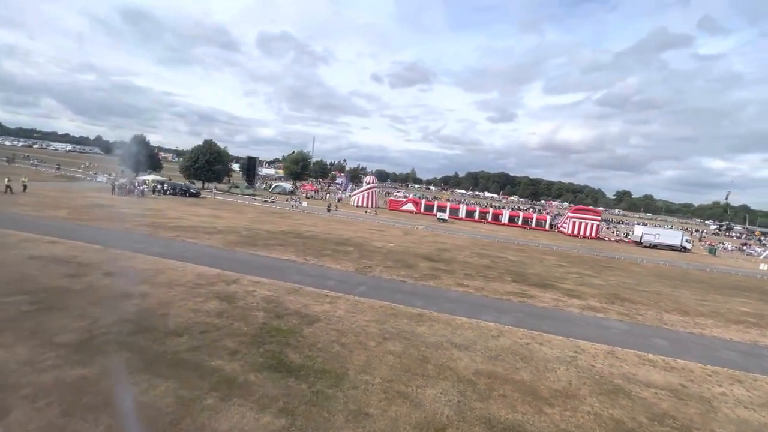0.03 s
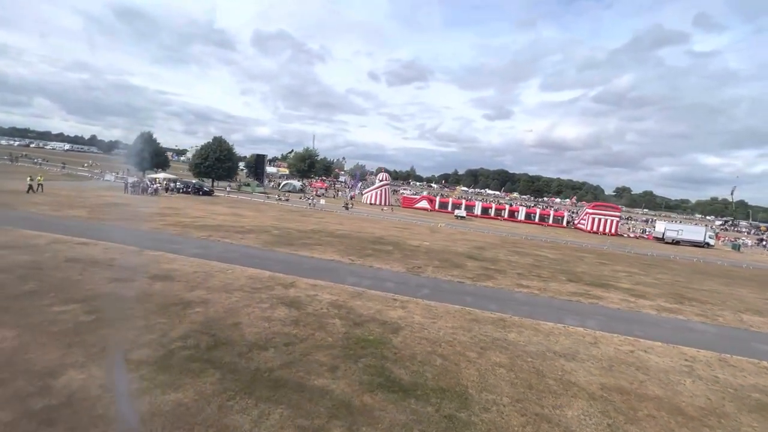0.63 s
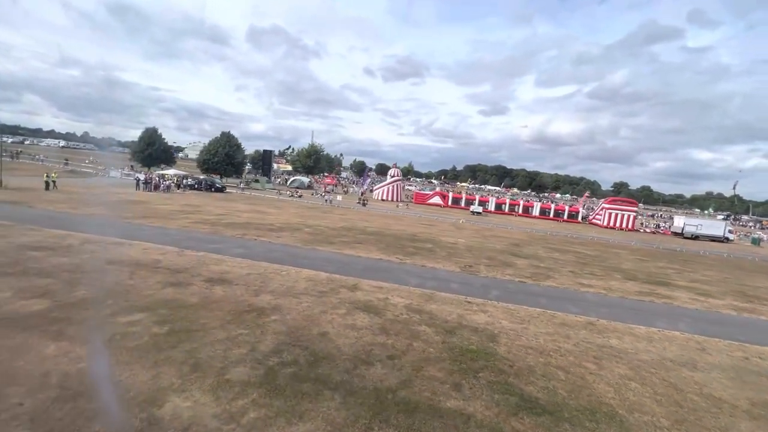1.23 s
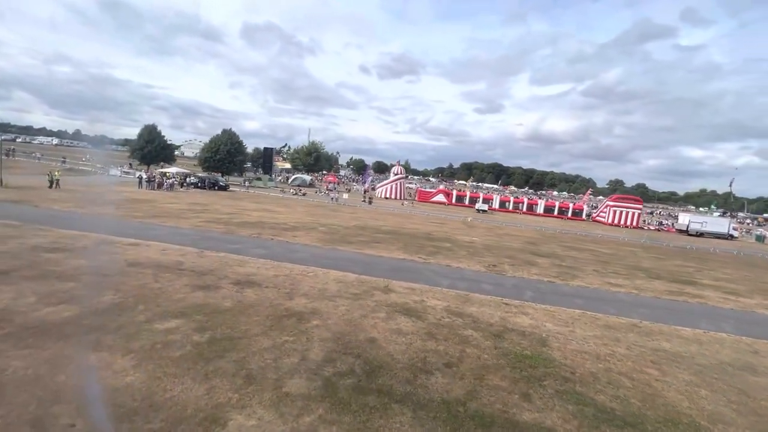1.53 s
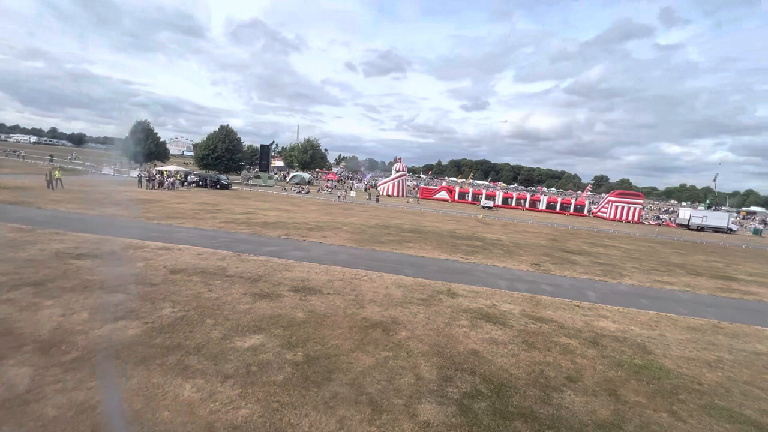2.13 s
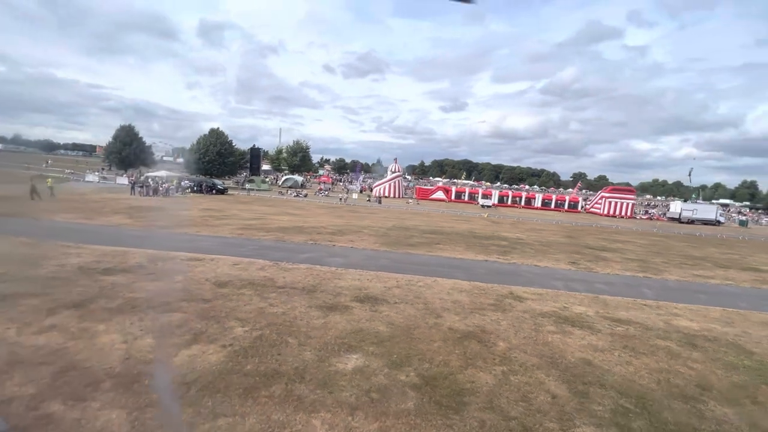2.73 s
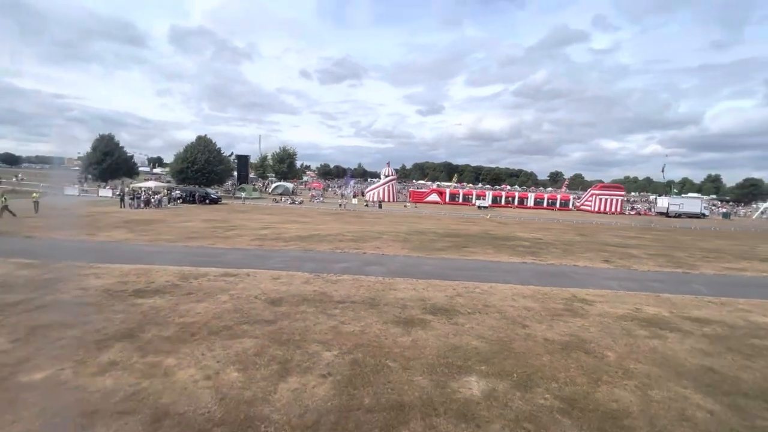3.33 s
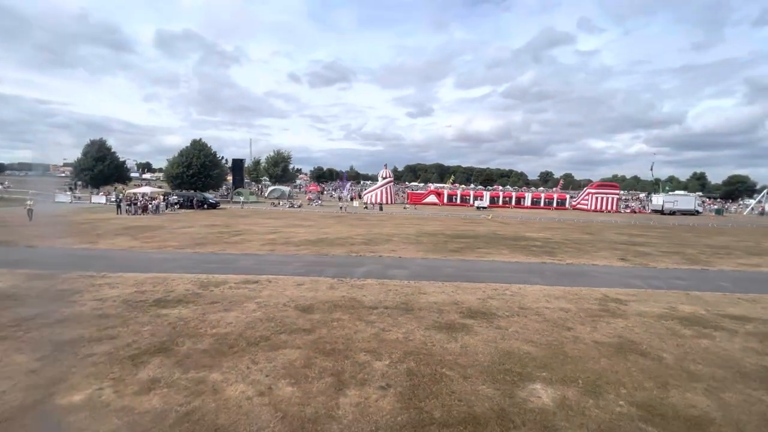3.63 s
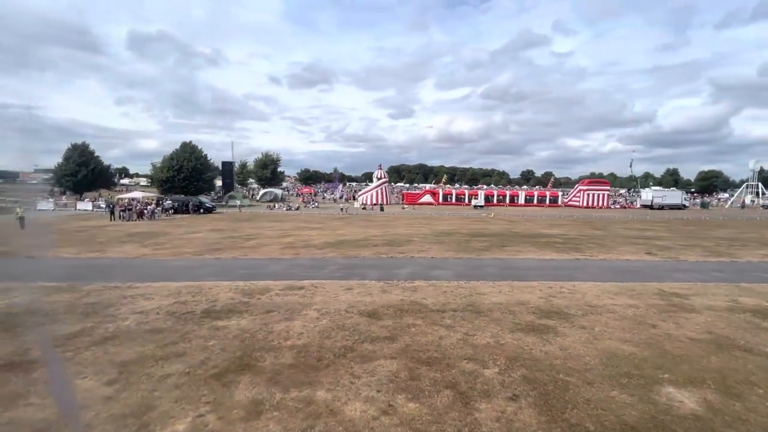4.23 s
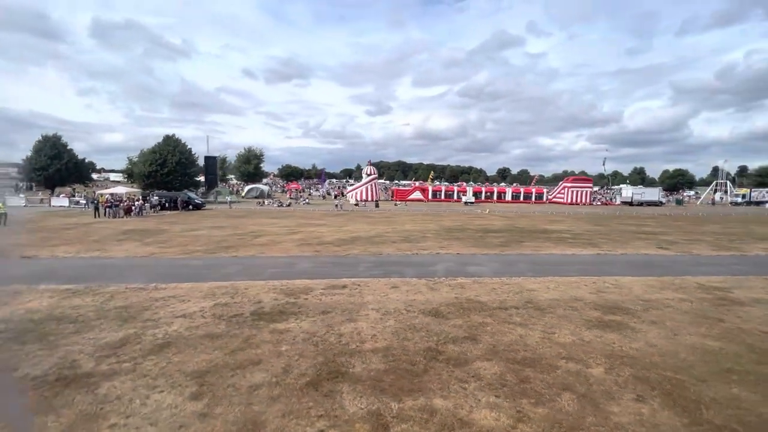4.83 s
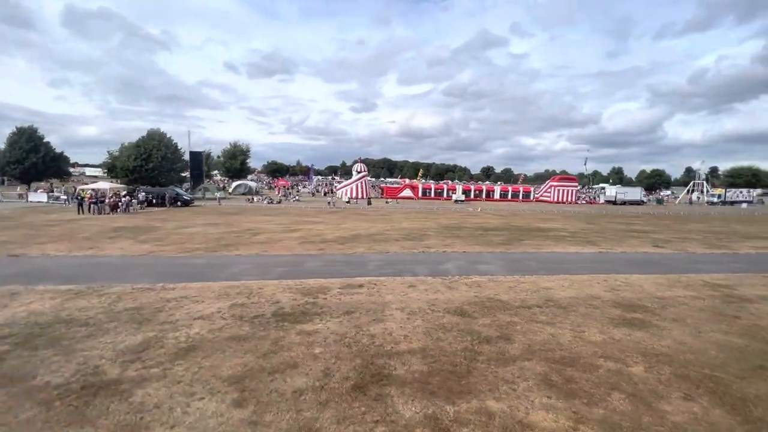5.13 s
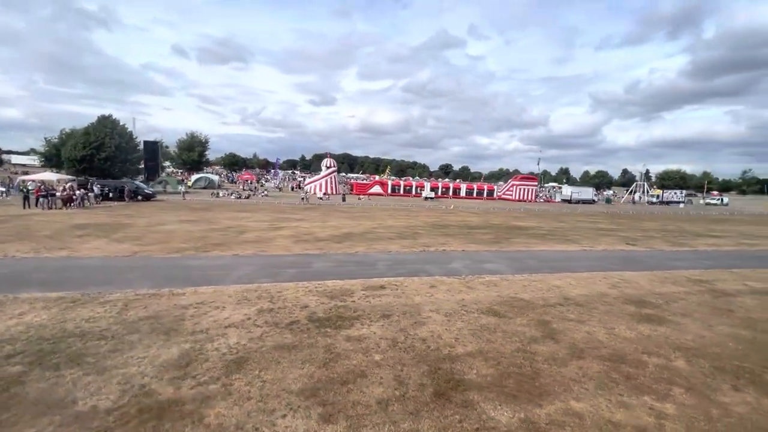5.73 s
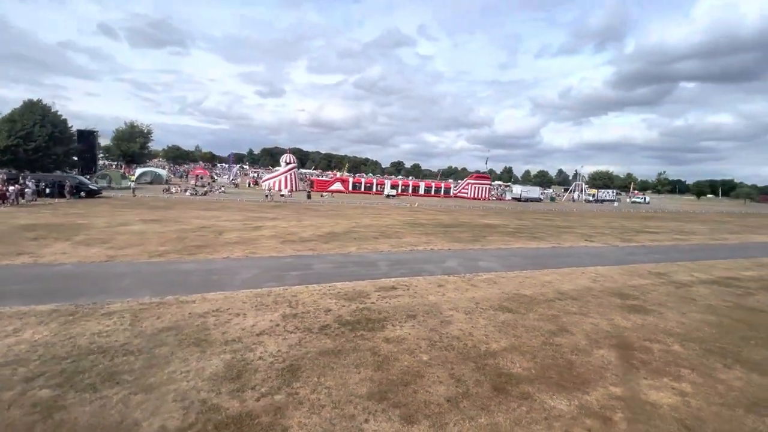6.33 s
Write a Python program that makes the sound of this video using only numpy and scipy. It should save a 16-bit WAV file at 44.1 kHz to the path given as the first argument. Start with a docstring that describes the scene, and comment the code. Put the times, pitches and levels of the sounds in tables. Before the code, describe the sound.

Inside a low-flying helicopter, a deep rotor thump and steady air roar run under high gear and engine whines.

```python
"""A deep thumping and a roar of air fill the cabin of a turbine helicopter sinking low over a field.
The two-bladed main rotor thumps through the hull, and the air it pushes down (the downwash) roars.
The tail rotor drones, and shafts and gears whine, their pitch tied to the rotor speed.
Far above them whistles the compressor, on the engine's own free-turning shaft (the spool).
Near the end comes one dull knock."""
import sys
import numpy as np
from scipy import signal
from scipy.fft import rfft, irfft, next_fast_len
from scipy.io import wavfile

SR = 44100
rng = np.random.default_rng(int(sys.argv[2]) if len(sys.argv) > 2 else 0)


def to_wav(sig):
    """Store sig (one row per channel, or 1-D mono) as 16-bit WAV at the path in sys.argv[1].

    Samples outside -1..1 are clipped; the rate is SR.
    """
    pcm = np.clip(np.atleast_2d(sig), -1, 1) * 32767
    pcm = np.round(pcm).astype(np.int16)
    wavfile.write(sys.argv[1], SR, pcm.T)  # frames by channels


N = 280905
# At normal speed: main rotor turns, tail blade passes and main gear teeth meeting (the mesh), per second.
ROTOR_HZ, TAIL_HZ, MESH_HZ = 6.492, 84.25, 1883.5

# The tone colour of the air roar. Each row: frequency in Hz, left and right level in dB per Hz.
ROAR_SPECTRUM = [(29, -66, -68), (45.3, -43, -42), (71, -46, -44), (133, -48.5, -43.5), (213, -48, -45.5),
                 (250, -50.5, -46), (298, -53.5, -48.5), (540, -61, -53), (657, -59.5, -59),
                 (805, -61, -57), (905, -63.5, -60.5), (1100, -67.5, -65), (1220, -66, -63.5),
                 (1290, -63.5, -65.5), (1510, -71, -65.5), (1700, -72, -68), (1976, -69, -64.5),
                 (2140, -79.5, -79), (2400, -81, -75), (2660, -84.5, -73), (2940, -91, -79),
                 (3100, -82.5, -77.5), (3800, -92, -82.5), (4820, -91, -77.5), (5080, -98, -78),
                 (5300, -91, -86.5), (5470, -94, -79.5), (6090, -98, -79), (6920, -100, -87),
                 (7700, -101, -100), (8280, -100, -95), (10460, -105, -105), (11410, -91, -90.5),
                 (13500, -79, -82), (13900, -102, -102)]
# How alike the roar is at both ears. Each row: frequency in Hz, likeness (1 the same, -1 opposite).
EAR_LIKENESS = [(60, 1), (130, 0.87), (290, 0.72), (480, 0.35), (590, 0), (690, -0.85), (840, -0.8),
                (1050, -0.3), (1400, -0.45), (2200, -0.3), (2800, 0.1), (7000, -0.35), (8300, .6),
                (11000, -0.12)]
# The downwash grows as the ground nears. Each row: time in seconds, gain in dB.
WASH_LEVEL = [(0, -0.2), (1, -1.5), (2.2, -2.5), (2.7, -1), (3.3, 0.3), (4.2, 1), (4.8, 1), (5.3, 1.5),
              (5.9, 1.5), (6.37, 1.3)]
# The roar surges around 450 Hz. Each row: time in seconds, gain in dB.
SURGE_LEVEL = [(0, 0.5), (1.9, 1.2), (2.2, -1), (2.75, 2.7), (3, -2.4), (3.5, -0.8), (4.2, -0.5), (4.9, 1),
               (5.55, 2.4), (5.9, 0), (6.37, 2.5)]

# How fast the engine spins. Each row: time in seconds, spool turns per second.
SPOOL_SPEED = [(0.0, 749.0), (0.55, 750.0), (1.8, 773.0), (2.3, 772.0), (3.1, 764.8), (3.8, 769.8),
               (4.4, 771.2), (5.3, 782.8), (6.37, 773.0)]
# The compressor whistle comes and goes. Each row: time in seconds, relative level in dB.
WHISTLE_LEVEL = [(0.15, -47), (0.6, -50), (1.5, -50), (1.9, -53.5), (2.4, -45.5), (2.65, -51.5),
                 (3.0, -40.5), (3.45, -42.5), (3.9, -48.5), (4.45, -45), (4.85, -55), (6.2, -51)]
# The spool and its gears. Each row: multiple of the spool speed, left and right relative level in dB,
# lead in radians (how far the wave at the left ear is ahead of the right).
SPOOL_TONES = [(1, -46, -40.5, -2.8), (3, -61.5, -53.5, -1.6), (4, -78, -65, 0), (5.856, -68, -55.5, 0),
               (6.1, -70, -55, 0), (6.344, -67, -53.5, 0), (6.588, -72, -57.5, 0), (6.832, -76, -62, 0),
               (8, -85, -68, 0)]
# The lowest spool tone swells and fades. Each row: time in seconds, relative level in dB.
SPOOL_TONE_LEVEL = [(0, -39.5), (1.1, -31), (1.7, -55), (2.8, -76), (3.3, -38), (4.2, -37.5), (4.9, -32),
                    (6.37, -36)]
# The engine's four clearest whines, as multiples of the spool speed.
ENGINE_WHINES = (3, 5.856, 6.1, 6.344)
# Those whines swell and fade. Each row: time in seconds, then a gain in dB for each of the four.
ENGINE_WHINE_LEVEL = [(0.2, -4, -5, 5, 3), (1, 2, -5, 2, 3.5), (1.45, 7, 2, 4.5, 4), (1.9, 5, 1, 3, -5),
                      (2.25, 9.5, 2, 1, -8), (2.6, 4, 2, 4, 2), (3.3, 11, -3, 5, -1), (3.9, 5, 1, 5.5, 5.5),
                      (4.6, 11, -2, -3, 6.5), (4.95, 9, 6, -7, -6), (5.7, 8, 2, -9, 2),
                      (6.3, 3, 7.5, -2, -7)]

# Rotors and gears drift around their normal speed. Each row: time in seconds, main mesh pitch in Hz.
DRIVE_SPEED = [(0.0, 1874), (0.03, 1882), (1.19, 1868), (2.29, 1898), (3.25, 1875), (3.78, 1890),
               (4.49, 1868), (5.53, 1894), (6.33, 1893), (6.37, 1897)]
# Shaft hums and gear whines. Each row: pitch in Hz, left and right level in dB, lead in radians.
GEAR_TONES = [(98.9, -29, -22, -0.3), (164.9, -36, -34, -0.1), (403.7, -46, -42, -0.9),
              (488.5, -60, -44, -3.0), (624.5, -53, -46, -3.1), (637.9, -44, -40, -1.7),
              (650.7, -43, -36.5, 3.1), (976.4, -43, -40, -2.0), (1232.8, -54, -59, -2.3),
              (1275.8, -48, -51, -2.8), (1288.6, -40.3, -37.3, -1.9), (1314.9, -55, -51, -2.9),
              (1464.9, -59, -53, -2.7), (1784.6, -49, -50, 0.3), (1883.5, -29.7, -36.2, 1.6),
              (1914.0, -51, -55, 1.3), (1927.2, -50, -55, 1.3), (1940.0, -49, -47, 1.2),
              (1953.0, -51, -53, 1.3), (1983.1, -54, -60, -3.0), (2531.8, -72, -61, 1.6),
              (2577.2, -67, -56.5, 1.5), (3767.0, -76, -70, 0)]
# Gear whines pulse as the rotor turns. Each row: pitch in Hz, depth of the once-a-turn pulse, its peak
# in turns, depth of the twice-a-turn pulse, its peak in turns, roughness, roughness width in Hz.
GEAR_PULSES = [(976, .1, .55, .2, .05, .38, 35), (1289, .11, .1, .22, .25, .36, 50),
               (1883.5, .07, .33, .04, .45, .15, 70), (2577, .4, .7, .35, .2, 1.2, 28)]
# Six tones swell about their average level. Each row: time in seconds, relative level in dB.
MESH_LEVEL = [(0.0, -39.5), (0.62, -40.5), (0.8, -37.5), (1.21, -42), (1.35, -38), (3.73, -38),
              (3.81, -35.5), (4.31, -41.5), (5.06, -40.5), (5.09, -37), (6.23, -36), (6.37, -36.5)]
SHAFT_HUM_LEVEL = [(0, -23), (1, -25.5), (1.6, -24), (2.1, -22), (3.2, -22), (4.4, -22), (5.3, -21.5),
                   (6.37, -22.5)]
TAIL_DRONE_LEVEL = [(0, -34), (1, -37), (1.5, -31), (2.1, -31.5), (2.9, -30.5), (3.5, -34.5), (4.6, -37.5),
                    (5.4, -36), (5.9, -33), (6.2, -27), (6.37, -35)]
LOW_WHINE_LEVEL = [(0.4, -43), (0.9, -45), (1.1, -42.5), (1.8, -47.5), (2.0, -42.5), (2.85, -46),
                   (3.7, -40), (4.2, -43), (4.6, -40), (4.85, -45), (5.25, -41), (6.3, -44)]
MIDDLE_WHINE_LEVEL = [(0.2, -40.5), (1.3, -44), (2.3, -39), (2.75, -41), (2.97, -45), (3.45, -40.5),
                      (4.05, -40.5), (4.5, -47.5), (4.95, -43), (5.45, -47.5), (5.9, -41), (6.3, -39.5)]
HIGH_WHINE_LEVEL = [(0.0, -69), (1.31, -65), (1.35, -52), (2.4, -55.5), (4.81, -52.5), (6.23, -58),
                    (6.37, -53)]
# Which tone follows which swell. Each row: pitch in Hz, level table.
SWELLS = [(99, SHAFT_HUM_LEVEL), (253, TAIL_DRONE_LEVEL), (976, LOW_WHINE_LEVEL),
          (1289, MIDDLE_WHINE_LEVEL), (2577, HIGH_WHINE_LEVEL)]
# A tone beside a cabin resonance (a standing wave) changes level with the speed.
# Each row: pitch in Hz, dB per percent of extra speed, random swell in dB.
NEAR_RESONANCE = [(337, -2.5, 1.5)]

# The tail rotor. Each row: multiple of its blade rate, left and right level in dB, lead in radians.
TAIL_TONES = [(1, -35, -31, -0.6), (2, -44, -41, -0.9), (3, -34.5, -34.5, 0.4), (4, -40, -30, 3.0),
              (5, -45, -39.5, 0.1), (6, -54, -38, 0.3)]
# How hard the main blades slap the air. Each row: time in seconds, slap from 0 to 1.
BLADE_SLAP = [(0.8, 1), (1.3, 0.45), (1.8, 0), (3.2, 0), (3.9, 0.35), (4.6, 0.35), (5.2, 0.7), (5.9, 0.05)]
# The load on the main blades. Each row: time in seconds, relative load in dB.
BLADE_LOAD = [(0.25, -20), (1.35, -20.5), (1.65, -24), (2.25, -23), (2.8, -26), (3.15, -18.5), (3.5, -20.5),
              (3.75, -19.5), (4.3, -21.5), (4.55, -26), (4.8, -25), (5.05, -20.5), (5.55, -21.5),
              (5.8, -24), (6.0, -18.5), (6.25, -30.5)]
# The tones in the thump. Each row: multiple of the rotor speed, relative level in dB,
# dB added per dB of load, dB added per unit of slap, random swell in dB.
ROTOR_TONES = [(4, -50, -5, 0, 1.5), (8, -24.5, 2.07, -0.5, -0.5), (12, -39, -1.5, 4, 4.5),
               (14, -56, -3.5, 10, 7), (16, -39, 3.5, 3, 1), (18, -45, 4.5, 17, 4.5)]
# Rotor throbs near 39, 65 and 71 Hz. Each row: time in seconds, relative level in dB.
DEEP_THROB_LEVEL = [(0, -26), (0.8, -25), (1.25, -44), (1.8, -36), (2.1, -44), (2.65, -32), (3.25, -45),
                    (3.75, -25), (4.3, -46), (4.6, -25), (5.1, -27), (5.7, -44), (6.37, -33)]
MIDDLE_THROB_LEVEL = [(0, -36), (0.5, -25), (1, -30), (1.4, -28), (2, -31), (3, -19.5), (3.45, -36),
                      (3.8, -30), (4.35, -18.5), (4.85, -41), (5.2, -22.5), (5.6, -24.5), (6.15, -43)]
UPPER_THROB_LEVEL = [(0, -44), (1.4, -21), (1.9, -32), (2.4, -18.5), (2.75, -38), (3.1, -27), (3.45, -34),
                     (3.8, -26), (4.15, -42), (4.45, -44), (4.75, -42), (5.25, -32), (6.37, -37)]
# Which throb follows which table. Each row: multiple of the rotor speed, level table.
THROBS = [(6, DEEP_THROB_LEVEL), (10, MIDDLE_THROB_LEVEL), (11, UPPER_THROB_LEVEL)]


def undb(db):
    """Turn decibels into a gain to multiply by."""
    return 10 ** (np.asarray(db) / 20)


def curves(table):
    """Join a table's points in time: one curve per value column, one value per sample."""
    seconds, *columns = np.transpose(table)
    return [np.interp(np.arange(N) / SR, seconds, column) for column in columns]


def swelling(table):
    """A gain that follows a level table above and below its average."""
    db, = curves(table)
    return undb(db - db.mean())


def over_hz(table):
    """Join a table's points in frequency: one curve per value column."""
    hz, *columns = np.transpose(table)
    log_hz = np.log(np.maximum(np.fft.rfftfreq(N, 1 / SR), 1))
    return [np.interp(log_hz, np.log(hz), column) for column in columns]


def walk(rate_hz):
    """A random wobble of typical size 1, mostly slower than the given rate."""
    size = next_fast_len(N)
    hz = np.fft.rfftfreq(size, 1 / SR)
    wobble = irfft(rfft(rng.standard_normal(size)) / np.sqrt(1 + (hz / rate_hz) ** 4), size)[:N]
    return wobble / wobble.std()


def flutter(rate_hz):
    """A random wobble of size and phase; it smears a tone into a band of noise."""
    return (walk(rate_hz) + 1j * walk(rate_hz)) / np.sqrt(2)


def at_ears(tone, left_db, right_db, lead):
    """A tone in the cabin reaches each ear with its own level and phase."""
    return np.sqrt(2) * np.real([undb(left_db) * tone * np.exp(1j * lead), undb(right_db) * tone])


def rotor_angle(clock, first_blade_s=.012):
    """The angle of the main rotor in radians; a blade passes every half turn."""
    return 2 * np.pi * ROTOR_HZ * (clock - first_blade_s)


def air_roar(clock, bass_hz=170, hiss_hz=1700, gust_db=0.5, chop_depth=0.057, hiss_db_per_s=0.31):
    """Downwash beats on the hull with each blade and surges, while air hisses past the doors."""
    left_db, right_db = over_hz(ROAR_SPECTRUM)
    likeness = np.clip(over_hz(EAR_LIKENESS)[0], -1, 1)
    noise = rfft(rng.standard_normal((2, N))) * np.sqrt(SR) / 2
    shared, opposite = noise * np.sqrt([1 + likeness, 1 - likeness])
    roar = np.array([(shared + opposite) * undb(left_db), (shared - opposite) * undb(right_db)])
    hz = np.fft.rfftfreq(N, 1 / SR)
    bass, body = (1 / (1 + (hz / edge_hz) ** 2) for edge_hz in (bass_hz, hiss_hz))
    middle = 1 / (1 + ((hz - 450) / 190) ** 4)  # 190 Hz to each side of 450 Hz
    surge = undb(curves(SURGE_LEVEL)[0] + 1.1 * walk(rate_hz=9)) - 1
    chop = chop_depth * curves(BLADE_SLAP)[0] * np.cos(2 * rotor_angle(clock))
    wash = irfft(roar * body, N) + chop * irfft(roar * bass, N) + surge * irfft(roar * middle, N)
    wash_db = curves(WASH_LEVEL)[0] + gust_db * walk(rate_hz=2.2)
    hiss = irfft(roar * (1 - body), N)
    from_middle_s = (np.arange(N) - N / 2) / SR
    hiss_db = hiss_db_per_s * from_middle_s + 0.3 * walk(rate_hz=8)  # a slow rise with a slight flicker
    return wash * undb(wash_db) + hiss * undb(hiss_db)


def knock(time_s=5.548, knock_s=.016, knock_db=-26.5, rattle_s=.1, rattle_db=-35, band_hz=(480, 1400)):
    """One dull knock in the cabin, with a short rough swell around it."""
    band = signal.butter(4, band_hz, "bandpass", fs=SR, output="sos")
    noise = signal.sosfilt(band, rng.standard_normal((2, N)))
    since_s = np.arange(N) / SR - time_s
    hit = undb(knock_db) * np.exp(-(since_s / knock_s) ** 2)
    rattle = undb(rattle_db) * np.exp(-(since_s / rattle_s) ** 2)
    return np.hypot(hit, rattle) * noise / noise.std()


def engine(spool_turns, gain_db=-5, swell_db=1.0):
    """The spool and the gears it drives sing thinly, glide with its speed, and swell and fade in turn."""
    whine_db = dict(zip(ENGINE_WHINES, curves(ENGINE_WHINE_LEVEL)))
    out = 0
    for multiple, left_db, right_db, lead in SPOOL_TONES:
        tone = np.exp(2j * np.pi * (multiple * spool_turns + rng.random()))
        if multiple == 1:
            gain = swelling(SPOOL_TONE_LEVEL)
        else:
            gain = undb(whine_db.get(multiple, 0) + swell_db * walk(rate_hz=4.5))
        out = out + at_ears(tone * gain, left_db, right_db, lead)
    return undb(gain_db) * out


def compressor(spool_turns, blades=18, gain_db=13.0, scatter=1.2, narrow_db=-41.0, wide_db=-50):
    """Passing blades whistle; swirling intake air smears the tone into a narrow and a wide hiss."""
    db, = curves(WHISTLE_LEVEL)
    tone = np.exp(2j * np.pi * blades * spool_turns)
    whistle = undb(db + gain_db) * (1 + scatter * flutter(rate_hz=30)) / np.hypot(1, scatter)
    hiss = undb(narrow_db) * flutter(rate_hz=210) + undb(wide_db) * flutter(rate_hz=700)
    hiss_gain = undb(0.3 * (db - db.mean()) + 1.3 * walk(rate_hz=25))
    return at_ears(tone * (whistle + hiss_gain * hiss), 0, 0, lead=2.51)


def sway(hz, unsteady):
    """A tone slowly swells: by its table, by drifting near a cabin resonance, or else at random."""
    for tone_hz, table in SWELLS:
        if abs(hz / tone_hz - 1) < .005:
            return swelling(table)
    for tone_hz, db_per_percent, swell_db in NEAR_RESONANCE:
        if abs(hz / tone_hz - 1) < .005:
            extra_speed_percent = 100 * (curves(DRIVE_SPEED)[0] / MESH_HZ - 1)
            return undb(db_per_percent * extra_speed_percent + swell_db * walk(rate_hz=2.6))
    return 1 + unsteady * flutter(rate_hz=1.0)


def tooth_chatter(angle, rate_hz, repeat_share=.75, slowest_hz=16, points=256):
    """Uneven gear teeth make a quick flutter; most of it comes round again with every rotor turn."""
    hz = np.fft.fftfreq(points, 1 / points) * ROTOR_HZ
    phases = np.exp(2j * np.pi * rng.random(points))
    one_turn = np.fft.ifft(phases * (abs(hz) > slowest_hz) / np.sqrt(1 + (hz / rate_hz) ** 4))
    point_angles = 2 * np.pi * np.arange(points) / points
    looped = np.interp(angle, point_angles, one_turn / one_turn.std(), period=2 * np.pi)
    return np.sqrt(repeat_share) * looped + np.sqrt(1 - repeat_share) * flutter(rate_hz)


def gear_pulsing(hz, angle):
    """A gear tone close to a listed whine throbs and chatters as the rotor turns; others run smooth."""
    for whine_hz, once, once_at, twice, twice_at, roughness, rough_hz in GEAR_PULSES:
        if abs(hz / whine_hz - 1) < .06:
            once_a_turn = once * np.cos(angle - 2 * np.pi * once_at)
            twice_a_turn = twice * np.cos(2 * (angle - 2 * np.pi * twice_at))
            return (1 + once_a_turn + twice_a_turn) * (1 + roughness * tooth_chatter(angle, rough_hz))
    return 1


def gearbox(clock, gain_db=0.03, rasp_left_db=-43, rasp_right_db=-45, rasp_width_hz=58):
    """Shafts hum and gears whine; tones near the main mesh swell with it and pulse four times a turn."""
    angle = rotor_angle(clock)
    mesh_gain = swelling(MESH_LEVEL) * (1 + .13 * np.cos(4 * angle))
    tones = 0
    for hz, left_db, right_db, lead in GEAR_TONES:
        tone = np.exp(2j * np.pi * (hz * clock + rng.random()))
        tone *= sway(hz, unsteady=.05) * gear_pulsing(hz, angle)
        if abs(hz - MESH_HZ) < 120:
            tone *= mesh_gain
        tones = tones + at_ears(tone, left_db, right_db, lead)
    # uneven teeth spread a rasp around the main mesh tone
    mesh = np.exp(2j * np.pi * MESH_HZ * clock)
    rasp = [np.sqrt(2) * np.real(mesh * tooth_chatter(angle, rasp_width_hz)) * undb(db)
            for db in (rasp_left_db, rasp_right_db)]
    return undb(gain_db) * tones + np.array(rasp)


def tail_rotor(clock):
    """The small, fast blades make a drone whose tones waver in the wake of the main rotor."""
    out = 0
    for multiple, left_db, right_db, lead in TAIL_TONES:
        hz = multiple * TAIL_HZ
        tone = np.exp(2j * np.pi * (hz * clock + rng.random()))
        out = out + at_ears(tone * sway(hz, unsteady=0.027), left_db, right_db, lead)
    return out


def main_rotor(clock, left_db=-1.75, right_db=0.75, sharpness=.14, slip_radians=.14, drift_hz=.8):
    """Low tones shift with the load and line up into a thump at each blade, sharper on a hard slap."""
    angle = rotor_angle(clock)
    load_db, = curves(BLADE_LOAD)
    slap, = curves(BLADE_SLAP)

    def rotor_tone(multiple, db):
        return undb(db) * np.exp(1j * (multiple * angle + slip_radians * walk(drift_hz)))

    thump = 0
    for multiple, db, per_load, per_slap, swell_db in ROTOR_TONES:
        effort_db = per_load * (load_db - load_db.mean()) + per_slap * (slap - slap.mean())
        thump = thump + rotor_tone(multiple, db + effort_db + swell_db * walk(drift_hz))
    for multiple, table in THROBS:
        thump = thump + rotor_tone(multiple, curves(table)[0])
    sharpen = 1 + sharpness * slap * np.cos(2 * angle)
    return at_ears(thump * sharpen, left_db, right_db, lead=0)


def scene():
    """Rotors and gears share one clock that runs with their speed; the engine spool turns freely."""
    clock = np.cumsum(curves(DRIVE_SPEED)[0] / MESH_HZ) / SR
    spool_turns = np.cumsum(curves(SPOOL_SPEED)[0]) / SR
    drive = main_rotor(clock) + tail_rotor(clock) + gearbox(clock)
    return drive + engine(spool_turns) + compressor(spool_turns) + air_roar(clock) + knock()


def record(dry):
    """The microphone drops the deepest bass, the recorder cuts the top, and both ends fade quickly."""
    bottom_hz, top_hz, fade_s = 18, 14400, .003
    bass_cut = signal.butter(2, bottom_hz, "highpass", fs=SR, output="sos")
    treble_cut = signal.ellip(10, .2, 80, top_hz, fs=SR, output="sos")
    samples_from_edge = np.minimum(np.arange(N), np.arange(N)[::-1])
    fade = np.minimum(1, samples_from_edge / (fade_s * SR))
    return signal.sosfilt(treble_cut, signal.sosfilt(bass_cut, dry) * fade)


dry = scene()
out = record(dry)
to_wav(out)
```